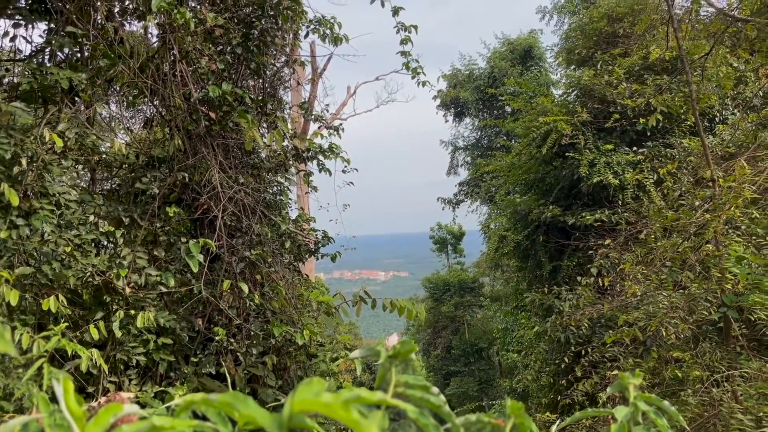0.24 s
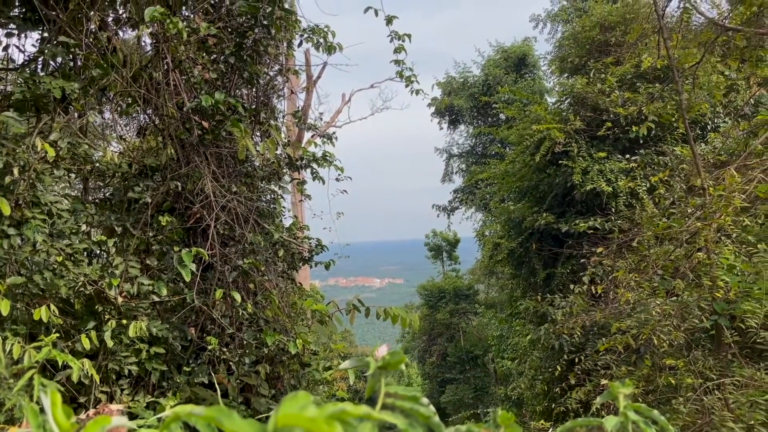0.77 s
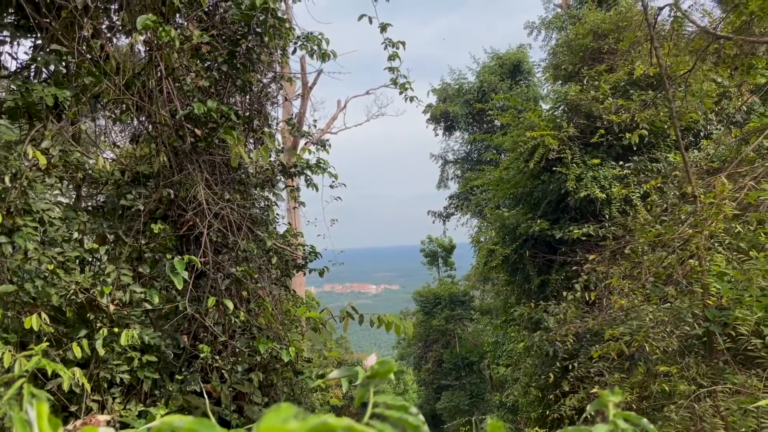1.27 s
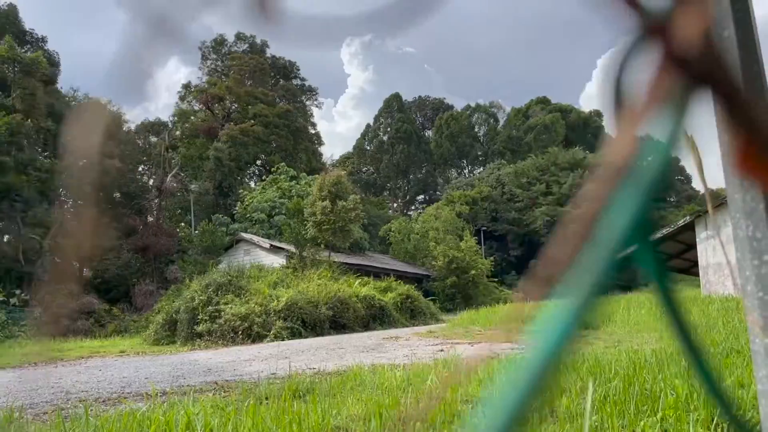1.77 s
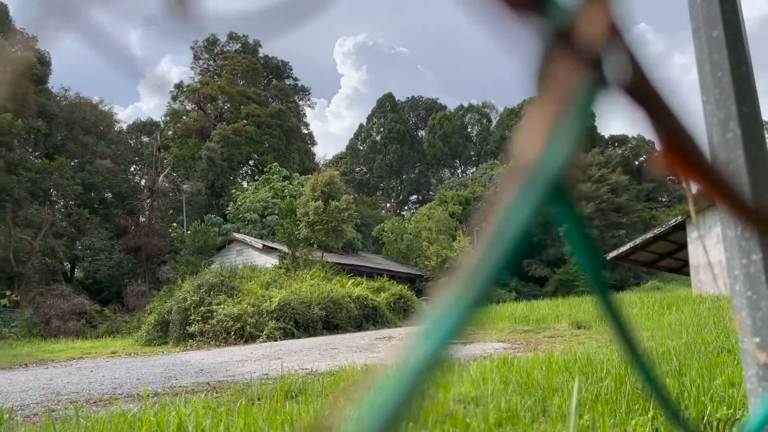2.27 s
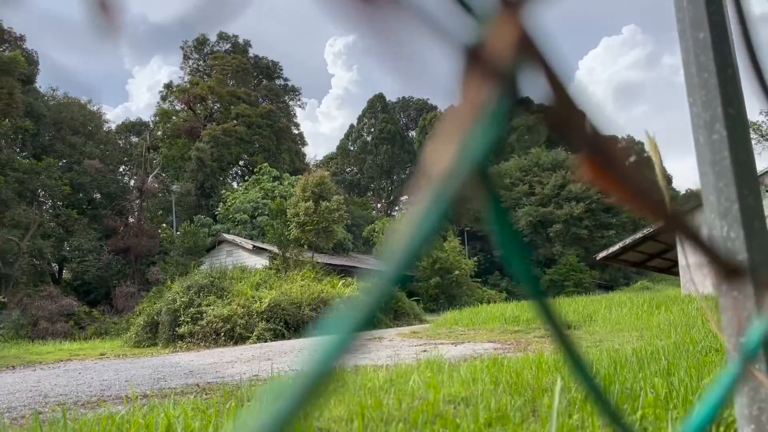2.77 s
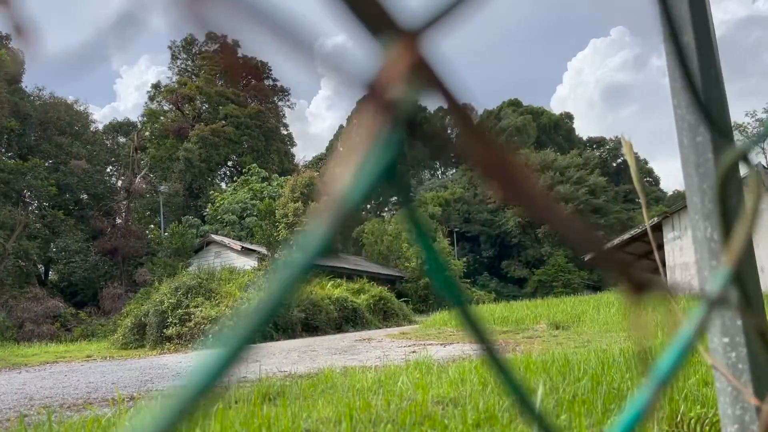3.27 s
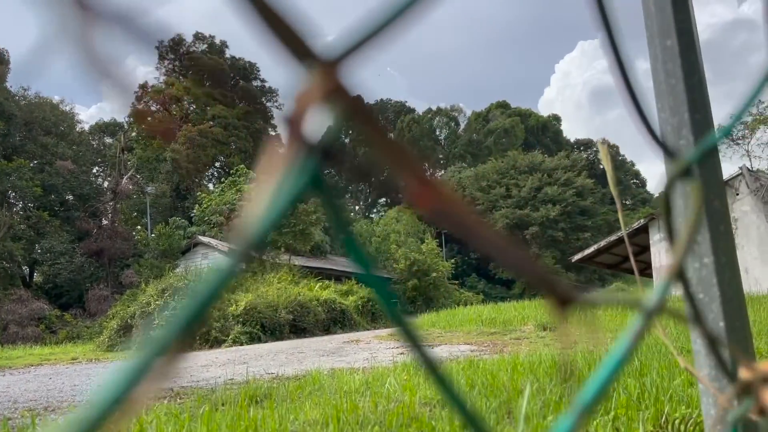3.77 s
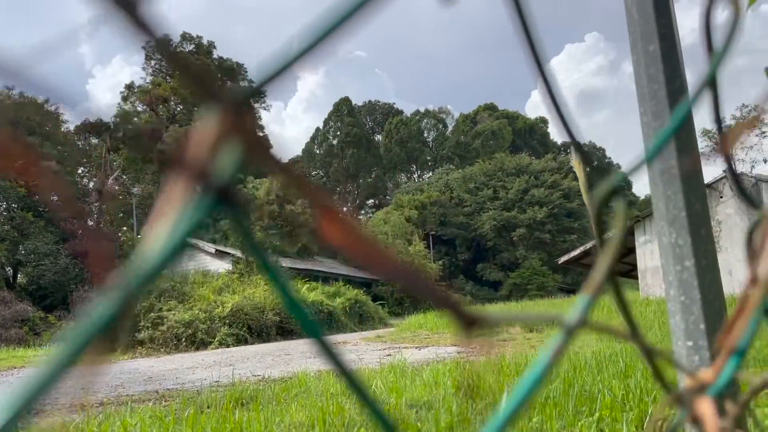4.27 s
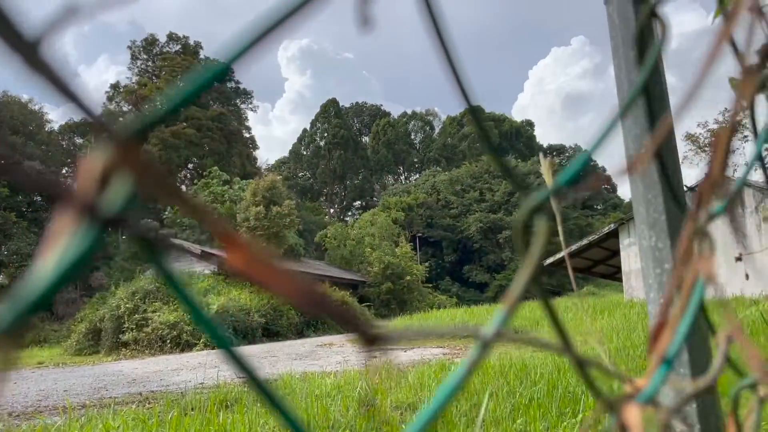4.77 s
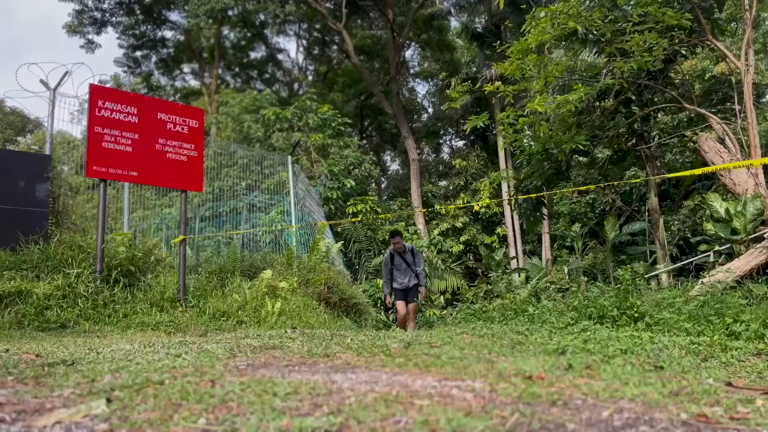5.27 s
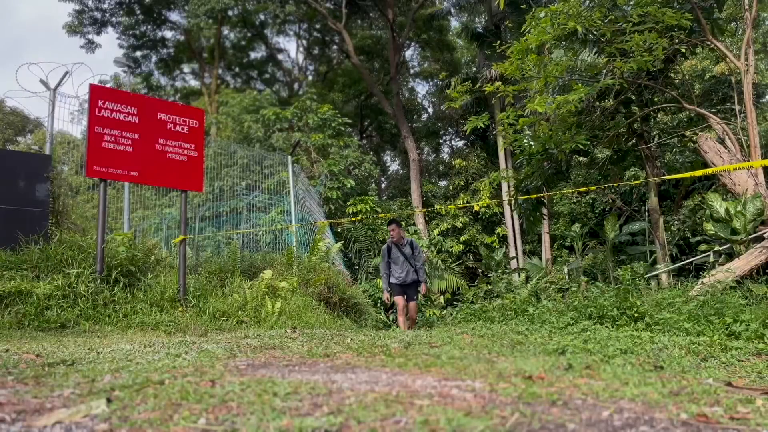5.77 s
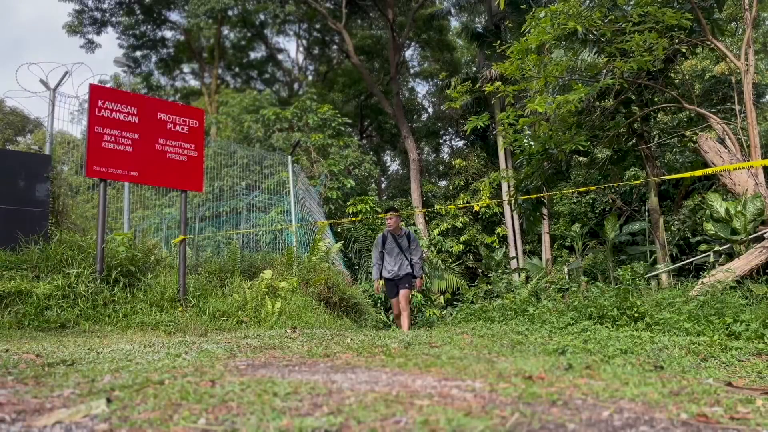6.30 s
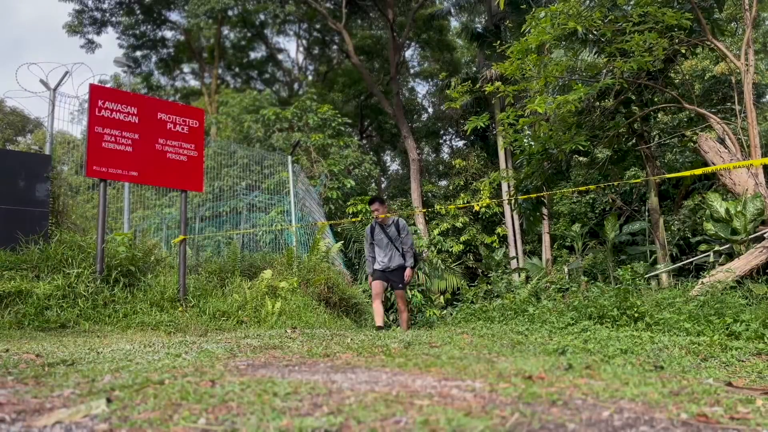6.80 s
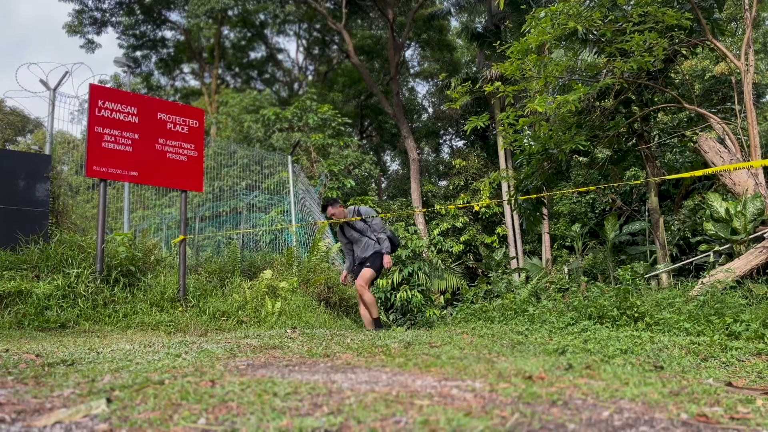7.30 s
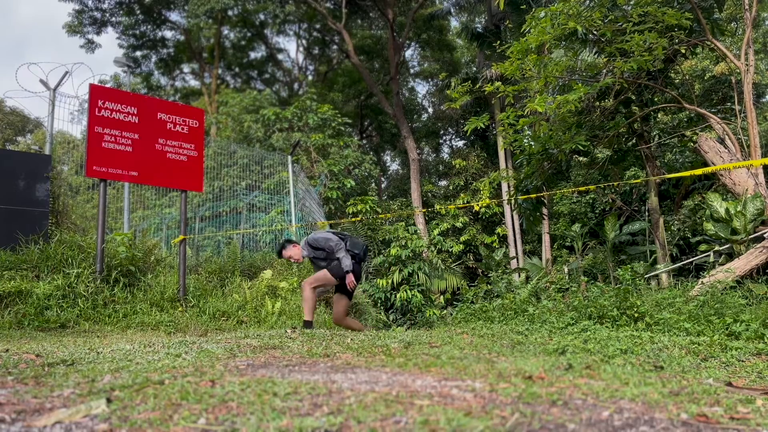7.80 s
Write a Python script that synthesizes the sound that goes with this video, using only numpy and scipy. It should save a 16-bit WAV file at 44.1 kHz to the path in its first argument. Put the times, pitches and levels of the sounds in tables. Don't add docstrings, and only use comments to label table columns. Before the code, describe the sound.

From 0 to 1.6 s a close cicada holds a piercing, rapidly buzzing whine around 7 to 8 kHz, shimmering through leaves. Distant traffic rumbles low beneath it; a katydid rasps faintly in the first second and a tiny bush cricket sizzles in short high bursts. At 1.6 s the scene cuts hard with a dry snap to a smoother, distant cicada hiss and quieter air. Close grass brushes, thuds and crackles come irregularly, with a light fence knock near 3.6 s, a tiny wire tick at 3.75, a clear stem snap at 4.15 and bunched knocks just after 5. At 5.15 s it cuts again: far cicadas persist, a brief rising cricket chirp sounds left around 5.8, and faint trills pulse. Soft grass steps continue, with small snaps near 6.8 and 7.0 and firmer footfalls around 7.7 to 7.8, until the end at about 8 s.

```python
import sys
import numpy as np
from scipy import signal
from scipy.fft import rfft, irfft, next_fast_len
from scipy.io import wavfile
from scipy.ndimage import map_coordinates

SR = 44100
rng = np.random.default_rng(int(sys.argv[2]) if len(sys.argv) > 2 else 0)


def unload_audio(sound):
    columns = np.transpose(np.atleast_2d(sound))
    steps = np.round(np.clip(columns, -1, 1) * 32767)
    wavfile.write(sys.argv[1], SR, steps.astype(np.int16))


def gain_from_db(level_db):
    decades = np.asarray(level_db, float) / 20
    return 10 ** decades


N = 355005


def unit(x):
    return x / np.sqrt(np.mean(x ** 2) + 1e-20)


def along(points, hz):
    f, v = np.transpose(points)
    return np.interp(np.log(hz + 1), np.log(f + 1), v)


def curves(rows):
    s, *cols = np.transpose(rows)
    return [np.interp(np.arange(N) / SR, s, c) for c in cols]


def during(t0, t1):
    t = np.arange(N) / SR
    return (t >= t0) & (t < t1)


CUTS = (1.632, 5.150)


def spot(index):
    edges = (0, *CUTS, N / SR)
    return during(edges[index], edges[index + 1])


def wobble(rate):
    return map_coordinates(rng.standard_normal(int(N * rate / SR) + 4), [np.arange(N) * rate / SR])


def swell(start, length, attack, release):
    t = np.arange(N) / SR - start
    return np.clip(t / abs(attack), 0, 1) * np.exp(-np.maximum(t - length, 0) / abs(release))


def filtered(x, response):
    m = next_fast_len(N + SR // 4)
    return irfft(rfft(x, m) * response(np.fft.rfftfreq(m, 1 / SR)), m)[..., :N]


def closed(spectrum):
    return lambda hz: gain_from_db(along(spectrum, hz)) * (hz > spectrum[0][0]) * (hz < spectrum[-1][0])


# hz, likeness [0-1]
PORT_LIKENESS = [(60, .98), (130, .93), (290, .8), (640, .55), (1100, .3), (2500, .08)]


def rush(spectrum):
    turn = lambda hz: np.arccos(np.clip(along(PORT_LIKENESS, hz), -1, 1)) / 2
    split = lambda hz: gain_from_db(along(spectrum, hz)) * [np.cos(turn(hz)), np.sin(turn(hz))]
    mid, side = filtered(rng.standard_normal((2, N)), split)
    return unit(np.array([mid + side, mid - side]))


def clicks(rate, scatter_db):
    turns = np.cumsum(rate) / SR
    at = np.interp(np.arange(1, int(turns[-1])), turns, np.arange(N))
    grid = np.floor(at)[:, None] + np.arange(-8, 9)
    offset = grid - at[:, None]
    shape = np.sinc(offset) * np.cos(np.pi * offset / 18) ** 2
    shape = shape * gain_from_db(scatter_db * rng.standard_normal((len(at), 1)))
    return np.bincount(np.clip(grid, 0, N - 1).astype(int).ravel(), shape.ravel(), N)


def leafy(x, t60):
    t = np.arange(int(SR * t60)) / SR
    echoes = unit(rng.standard_normal(len(t)) * gain_from_db(-60 * t / t60))
    return signal.fftconvolve(x, echoes)[:N]


PORT_DELAY_S, PORT_ZERO_HZ = .000152, 5150


def ports(x, stray_db, zero_hz=PORT_ZERO_HZ):
    sides = np.array([[1], [-1]])
    lag = lambda hz: np.exp(-1j * np.pi * PORT_DELAY_S * (hz - zero_hz) * sides)
    stray = np.array([np.roll(x, 900), np.roll(x, 1700)])
    return filtered(x, lag) + gain_from_db(stray_db) * stray


def trill(pitch_hz, width_hz, strokes, depth):
    ring = 1j * wobble(width_hz) + wobble(width_hz)
    ring = ring + 0.43 * wobble(2.8 * width_hz)
    tone = np.real(ring * np.exp(2j * np.pi * np.cumsum(pitch_hz * np.ones(N)) / SR))
    stroke_turns = np.cumsum(strokes * (1 + 0.037 * wobble(3))) / SR
    return unit(tone * gain_from_db(depth * np.cos(2 * np.pi * stroke_turns)))


def phrases(rows, attack, release):
    glide = [point for s, length, db, a, b in rows for point in ((s, a), (s + length, b))]
    pitch, = curves(glide)
    return pitch, sum(gain_from_db(db) * swell(s, length, attack, release) for s, length, db, a, b in rows)


# hz, density_db [dB per Hz]
ENGINES = [(12, -49), (24, -12), (40, -1), (52, -2), (70, 3), (160, -12.5), (210, -35), (350, -120)]
# hz, density_db [dB per Hz]
AIR_COLOUR = [
    [(65, -42), (110, -4.5), (194, -1), (361, -12), (539, -15.5), (779, -25.5), (1130, -30), (1770, -45.5),
     (3450, -43), (4750, -42.5), (6000, -41.5), (7800, -56), (13200, -120)],
    [(65, -23), (110, -5.5), (167, -6), (488, -22), (1200, -31), (1800, -43.5), (3230, -39.5),
     (4150, -38.5), (4750, -31), (5430, -35), (6000, -53), (7800, -65), (13200, -120)],
    [(65, -39), (110, -5.5), (144, -2.5), (176, -5.5), (343, -14.5), (659, -33), (819, -33), (1140, -38.5),
     (2730, -40), (3450, -39), (6000, -35.5), (7800, -62), (13200, -120)],
]
# left_lag_samples, left_minus_right_db
AIR_BEARING = [
    (2, -0.6),
    (18.6, -0.8),
    (4, 0.3),
]
# time_s, swell_db
ROAD_SWELL = [
    [(0, 1), (.3, -1), (.8, 0.7), (1.3, 1), (1.63, -0.1)],
    [(1.64, -1.5), (1.87, -5), (2.4, -0.2), (3.2, -0.3), (3.4, -0.06), (4.7, 1), (4.98, 1.1), (5.15, 1.9)],
    [(5.15, 0.5), (5.3, .6), (5.8, -0.5), (7.0, -0.17), (7.8, .3), (8.05, 0)],
]
ENGINES_DB, AIR_DB = (-51.5, -51.5, -52.5), (-54, -59.5, -61)
ENGINES_GROW, AIR_GROWS = 1.8, 0.71


def rumble():
    out = 0
    for k in range(3):
        busy_db, = curves(ROAD_SWELL[k])
        engines = gain_from_db(ENGINES_DB[k] + ENGINES_GROW * busy_db + 0.73 * wobble(5.2)) * rush(ENGINES)
        lag, pan_db = AIR_BEARING[k]
        left, right = rush(AIR_COLOUR[k])
        air = np.array([gain_from_db(pan_db / 2) * np.roll(left, round(lag)), gain_from_db(-pan_db / 2) * right])
        air_gain = gain_from_db(AIR_DB[k] + AIR_GROWS * busy_db + 0.87 * wobble(7.6))
        out = out + spot(k) * (engines + air_gain * air)
    return out


# hz, level_db
CICADA_BODY = [(5500, -48), (6166, -31), (6460, -39), (6760, -24), (7050, -9), (7348, 0), (7630, -5),
               (8230, -8), (8520, -5), (8820, -13), (9700, -18), (10290, -26), (11800, -36), (15750, -44)]
CICADA_DB, CLICKS_PER_S = -39, 293.8
PEAK_HZ, PEAK_WIDE_HZ, PEAK_FADES_PER_S = 7270, 260, 0.27
LEAVES_DB, LEAVES_DB_PER_S, SWAYS_PER_S = -10.5, 10, 18
TURN_HZ = (4720, 5120)


def cicada():
    t = np.arange(N) / SR
    buckle = clicks(CLICKS_PER_S * (1 + .001 * wobble(6) + .0011 * wobble(70)), scatter_db=.5)
    delays = rng.uniform(0, 2 * np.pi, 160)
    bands_hz = np.linspace(0, SR / 2, len(delays))
    canopy = lambda hz: np.exp(1j * np.interp(hz, bands_hz, np.cumsum(delays - np.pi)))
    sway = 2.67 * wobble(SWAYS_PER_S)
    echoes = np.cos(sway) * leafy(buckle, t60=0.073) + np.sin(sway) * leafy(buckle, t60=0.071)
    share = gain_from_db(LEAVES_DB + LEAVES_DB_PER_S * t * spot(0))
    mixed = (unit(filtered(buckle, canopy)) + share * unit(echoes)) / np.sqrt(1 + share ** 2)
    heard = filtered(mixed, closed(CICADA_BODY))
    peak = filtered(heard, lambda hz: np.exp(-((hz - PEAK_HZ) / PEAK_WIDE_HZ) ** 2))
    heard = unit(heard - PEAK_FADES_PER_S * t * spot(0) * peak)
    first, last = (ports(heard, stray_db=-12, zero_hz=hz) for hz in TURN_HZ)
    turned = t / CUTS[0]
    return spot(0) * gain_from_db(CICADA_DB) * ((1 - turned) * first + turned * last)


# clicks_per_s, level_db
SINGERS = [(287, -4), (299.6, -9), (313.5, 9), (318.5, -7), (327, -0.5), (341, 5)]
# hz, level_db
EDGE_CHORUS = [(5400, -32), (6000, -24), (6600, -12), (7100, -2.5), (7500, 0), (8000, -.5), (8600, -6),
               (9300, -20), (10200, -23), (11300, -28), (13000, -23), (14200, -14), (15000, -22),
               (15750, -30)]
# hz, level_db
FENCE_CHORUS = [(5400, -33), (6000, -26), (6600, -12.5), (7100, -4), (7500, 0), (8000, -2), (8600, -7.5),
                (9300, -14), (10200, -19), (11500, -30), (13000, -28.5), (14200, -26.5), (15000, -29),
                (15750, -28.5)]
# hz, level_db
PATH_CHORUS = [(5400, -34), (6000, -26.5), (6600, -11.5), (7100, -2), (7500, 0), (8000, -.5), (8600, -6.5),
               (9300, -15), (10200, -19), (11500, -34), (13000, -30), (14200, -25.5), (15000, -31),
               (15750, -30)]
CHORUS_DB, CHORUS_SAG_DB_PER_S = (-52, -48.5, -50), (-0.2, 0.14, -0.39)


def chorus():
    crowd = 0
    for rate, db in SINGERS:
        crowd = crowd + gain_from_db(db) * leafy(clicks(rate * (1 + .002 * wobble(5)), scatter_db=2.5), t60=.25)
    crowd = unit(crowd) + 1.3 * rng.standard_normal(N)
    out = 0
    for k, colour in enumerate((EDGE_CHORUS, FENCE_CHORUS, PATH_CHORUS)):
        since = np.arange(N) / SR - (0, *CUTS)[k]
        level = gain_from_db(CHORUS_DB[k] - CHORUS_SAG_DB_PER_S[k] * since + 0.52 * wobble(15))
        out = out + spot(k) * level * ports(unit(filtered(crowd, closed(colour))), stray_db=-12)
    return out


# start_s, length_s, level_db
SIZZLES = [(.0, .07, -68), (.14, .12, -67), (.3, .12, -65.5), (.56, .19, -66.5), (.91, .17, -66),
           (1.24, .24, -66.5)]


def bush_cricket():
    gain = sum(gain_from_db(db) * swell(s, length, .04, .015) for s, length, db in SIZZLES)
    return ports(gain * trill(10750, width_hz=1500, strokes=35, depth=1.5), stray_db=-14.0)


# start_s, length_s, level_db, first_pitch_hz, last_pitch_hz
NEAR_KATYDID = [(0.068, 0.186, -70, 4910, 4690), (0.269, 0.15, -71.5, 4870, 4720),
                (0.436, 0.22, -71.5, 4963, 4934), (0.733, 0.12, -84, 4830, 4850)]
# start_s, length_s, level_db, first_pitch_hz, last_pitch_hz
FAR_KATYDIDS = [(1.64, .55, -81.5, 4900, 5003), (2.33, .75, -80.5, 4650, 4950),
                (3.45, 0.6, -81, 4680, 5000), (4.49, 0.29, -74, 4606, 4806), (4.87, 0.17, -79, 4960, 4880),
                (5.38, .2, -86.5, 4950, 4960), (5.65, .5, -84.5, 4800, 4834), (6.28, .15, -85, 4630, 4870),
                (6.6, .5, -84, 5040, 4910), (7.25, .7, -81, 4810, 4880)]
MURMUR_DB = -96
RASP_DB, RASP_FADE_S = -7.5, 0.13
TOOTH_HZ, LOWER_DB, LOWER_RISE_S = 210, -2.5, 0.12
BUZZ_START_S, BUZZ_LENGTH_S, BUZZ_DB = 0.43, 0.16, -74.5


def katydids():
    pitch, gain = phrases(FAR_KATYDIDS, attack=0.053, release=0.13)
    far = (1 - spot(0)) * (gain + gain_from_db(MURMUR_DB)) * trill(pitch, width_hz=460, strokes=24, depth=3.7)
    pitch, gain = phrases(NEAR_KATYDID, attack=0.02, release=0.044)
    higher = gain_from_db(-4.0) * trill(5350, width_hz=700, strokes=31, depth=3.9)
    near = gain * (trill(pitch, width_hz=130, strokes=28, depth=1.9) + higher)
    late, starts = 0, 0
    for s, length, db, _, _ in NEAR_KATYDID:
        late = late + gain_from_db(db + LOWER_DB) * swell(s, length, LOWER_RISE_S, 0.054)
        starts = starts + gain_from_db(db + RASP_DB) * swell(s, .015, 0.007, RASP_FADE_S)
    lower = late * trill(pitch - TOOTH_HZ, width_hz=110, strokes=25, depth=1.7)
    rasp = starts * trill(pitch / 2, width_hz=320, strokes=60, depth=2.2)
    buzz_gain = gain_from_db(BUZZ_DB) * swell(BUZZ_START_S, BUZZ_LENGTH_S, 0.11, 0.051)
    buzz = buzz_gain * trill(3410, width_hz=560, strokes=55, depth=3.3)
    return ports(far + near + lower + rasp + buzz, stray_db=-2.0)


# start_s, level_db, length_s
STEPS = [(2.06, -69, 0.028), (2.526, -72.5, .026), (2.767, -80, .026), (3.316, -77, 0.023),
         (3.403, -68, 0.023), (4.728, -78, 0.027), (5.096, -73, .024), (5.137, -71, .02),
         (5.675, -76, 0.024), (6.112, -77, 0.033), (7.076, -76, 0.042), (7.419, -79, 0.046),
         (7.59, -78, .027), (7.723, -71.5, 0.033), (7.782, -66.5, 0.025)]
# start_s, level_db, length_s
BUMPS = [(3.635, -68, .012), (3.651, -69, 0.016), (5.0094, -69.5, 0.048), (5.037, -66.5, 0.042),
         (5.134, -65, 0.025), (7.68, -79.5, 0.035)]
# start_s, level_db, length_s
SNAPS = [(1.632, -47, .03), (2.0586, -64, 0.013), (4.154, -57.5, 0.041), (5.064, -71.5, .024),
         (6.787, -59.5, 0.022), (7.036, -69, .027)]
# start_s, level_db, length_s
CRACKLES = [(2.197, -78, .03), (2.917, -64.5, 0.028), (3.623, -67, .027), (3.74, -72, 0.11),
            (3.968, -66, 0.014), (4.561, -61.5, .032), (4.724, -68, 0.022)]
# start_s, level_db, length_s
BRUSHES = [(1.892, -75.5, 0.082), (2.156, -71.5, 0.083), (3.316, -74, 0.067), (3.578, -71, .033),
           (3.869, -59, 0.014), (3.912, -70.5, 0.026), (4.011, -73, .023), (4.363, -65, 0.027),
           (4.391, -63.5, 0.04), (4.867, -71.5, 0.056), (4.923, -72, .04), (4.965, -62.5, .032)]
# thud_db, body_db, snap_db, crisp_db
STEP, BUMP, SNAP = (16, -1, -0.7, 2), (11, 15, .1, 1.6), (-1, -12, 1, 0)
CRACKLE, BRUSH = (-1, -9, -2, 8), (-3.5, 7, 3, 9.5)
LAYER_HZ = (500, 1030, 2150, 4300)
TICK_S, TICK_DB, TICK_HZ, TICK_T60_S = 3.7468, -49, 13300, .005


def rustles():
    levels, t = np.zeros((4, N + SR)), np.arange(SR // 4) / SR
    kinds = ((STEP, STEPS), (BUMP, BUMPS), (SNAP, SNAPS), (CRACKLE, CRACKLES), (BRUSH, BRUSHES))
    for layers_db, rows in kinds:
        for s, db, length in rows:
            until = min(c for c in (*CUTS, N / SR) if c + .003 > s) + .002
            shape = (1 - np.exp(-t / 0.0014)) * np.exp(-t / abs(length)) * (s + t < until)
            levels[:, round(s * SR):][:, :len(t)] += gain_from_db(db - 9.5 + np.array(layers_db)[:, None]) * shape
    out = np.zeros((2, N))
    for level, centre_hz in zip(levels, LAYER_HZ):
        crush = rng.standard_normal((2, N)) * gain_from_db(3.9 * wobble(350))
        band = lambda hz: np.exp(-(np.log2((hz + 1) / centre_hz) / 0.63) ** 2)
        out += level[:N] * unit(filtered(crush, band))
    left = .5 * np.roll(out[1], -3) + .87 * out[0]
    pan_db = np.where(spot(2), .3, -3.5)
    tick, t = np.zeros(N), np.arange(120) / SR
    ring = gain_from_db(TICK_DB - 60 * t / TICK_T60_S) * np.sin(2 * np.pi * TICK_HZ * t)
    tick[round(TICK_S * SR):][:len(t)] = ring
    return np.array([gain_from_db(pan_db / 2) * left, gain_from_db(-pan_db / 2) * out[1]]) + tick


# start_s, level_db, wing_beat_hz
CHIRP = [(5.722, -77, 70), (5.757, -76, 75), (5.791, -65, 80), (5.829, -58.5, 90), (5.863, -55, 185)]
# start_s, length_s, level_db
FAR_TRILLS = [(5.757, 0.86, -85.5), (6.788, .72, -84), (7.643, .45, -85)]
SYLLABLE_S, WING_HZ, SECOND_WING_DB = 0.029, 3380, -5


def crickets():
    gain = sum(gain_from_db(db) * swell(s, length, 0.032, 0.021) for s, length, db in FAR_TRILLS)
    far = gain * trill(3440, width_hz=400, strokes=49.7, depth=3.5)
    near, t = np.zeros(N + SR), np.arange(SR // 20) / SR
    shape = np.sin(np.pi * np.clip(t / SYLLABLE_S, 0, 1) ** 0.58)
    for s, db, beat_hz in CHIRP:
        hz = WING_HZ * (1 + 0.019 * rng.standard_normal())
        second_wing = gain_from_db(SECOND_WING_DB) * np.sin(2 * np.pi * (hz + beat_hz) * t - 3.6)
        wings = np.sin(2 * np.pi * hz * t) + second_wing
        near[round(s * SR):][:len(t)] += gain_from_db(db - 5.5) * shape * wings
    near = near[:N] + gain_from_db(-52) * leafy(near[:N], t60=0.2)
    return ports(far, stray_db=1.0) + near * gain_from_db([[1.5], [-1.5]])


def scene():
    return rumble() + cicada() + chorus() + bush_cricket() + katydids() + rustles() + crickets()


def roll_off(x):
    return signal.sosfilt(signal.butter(12, 15790, fs=SR, output="sos"), x)


def record(dry):
    mix = filtered(dry, lambda hz: hz ** 4 / (hz ** 4 + 32. ** 4))
    return roll_off(mix)


dry = scene()
out = record(dry)
unload_audio(out)
```